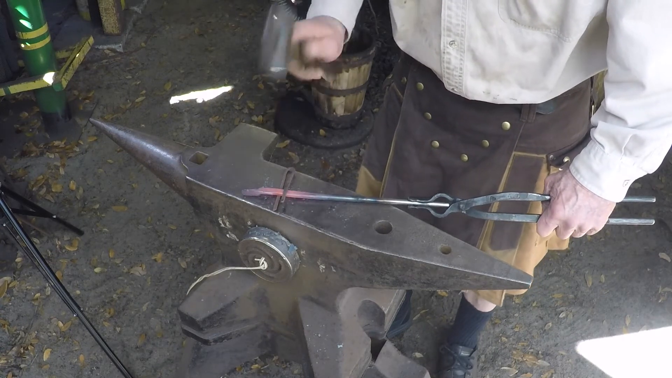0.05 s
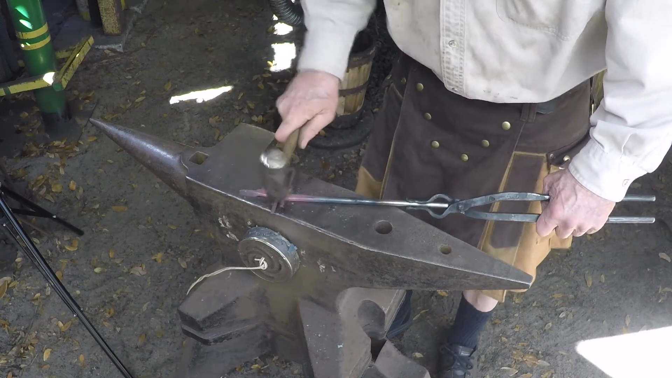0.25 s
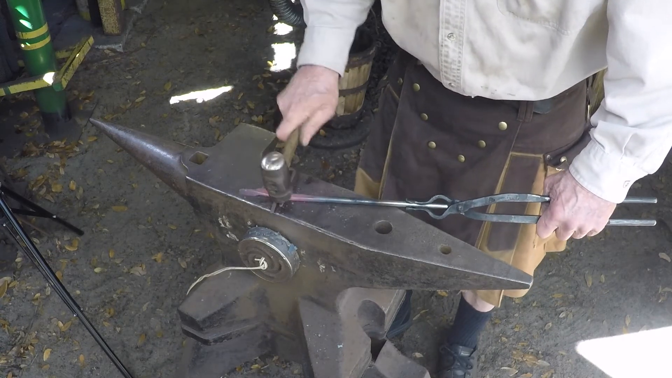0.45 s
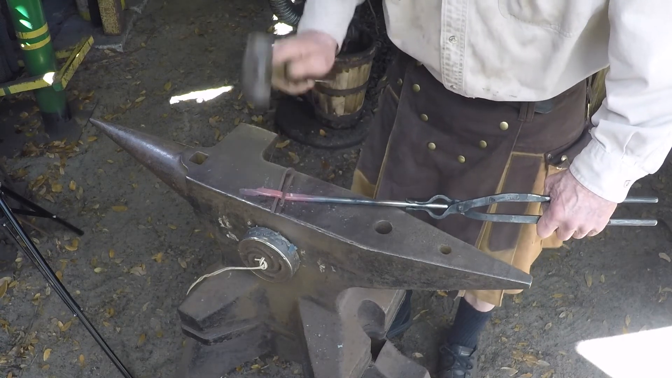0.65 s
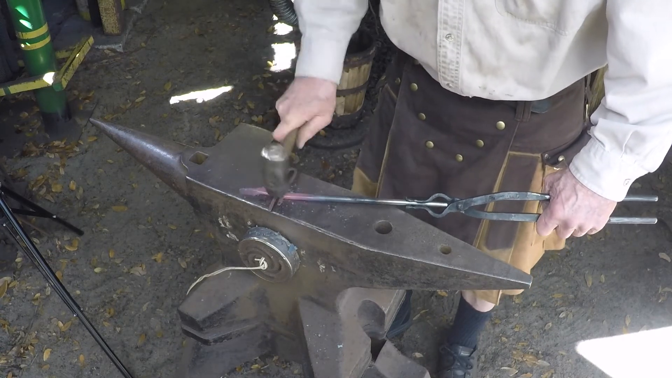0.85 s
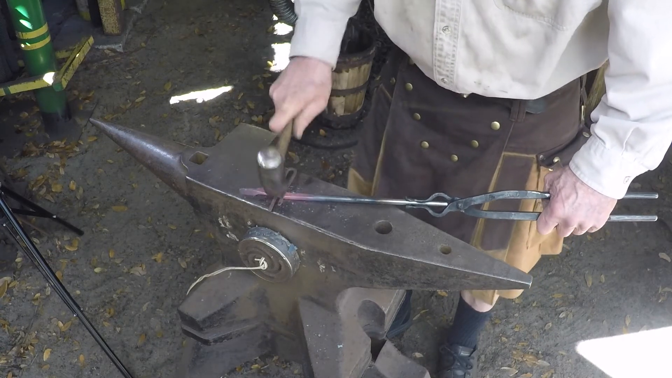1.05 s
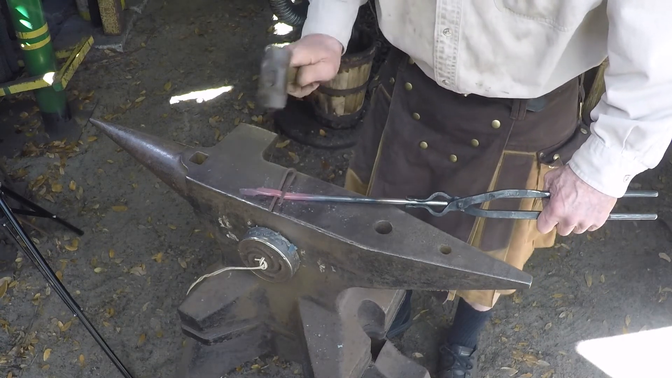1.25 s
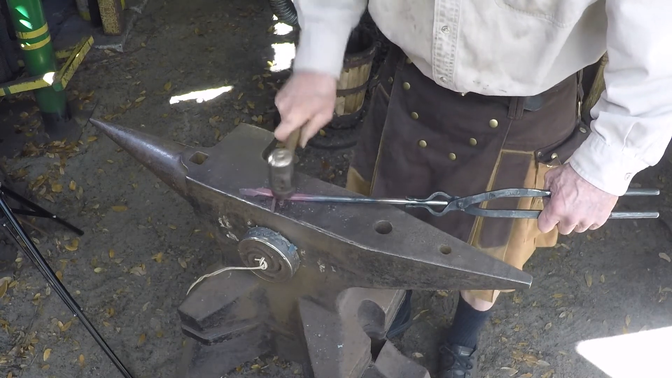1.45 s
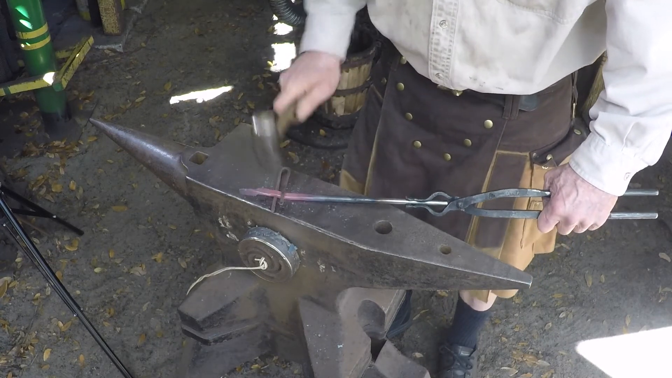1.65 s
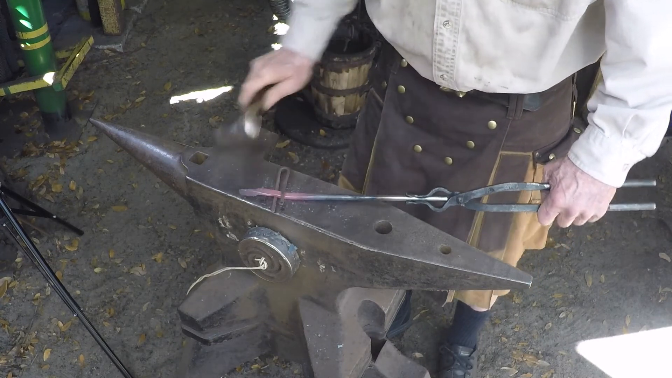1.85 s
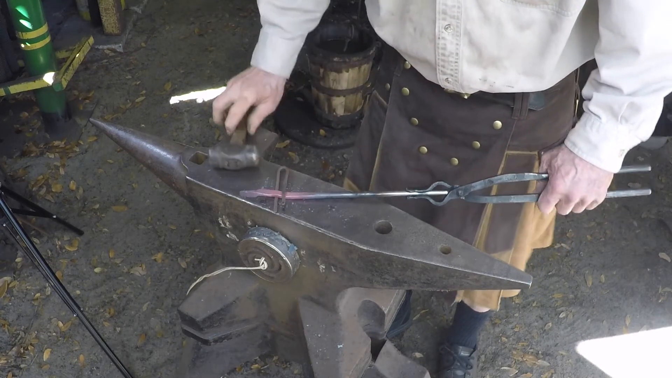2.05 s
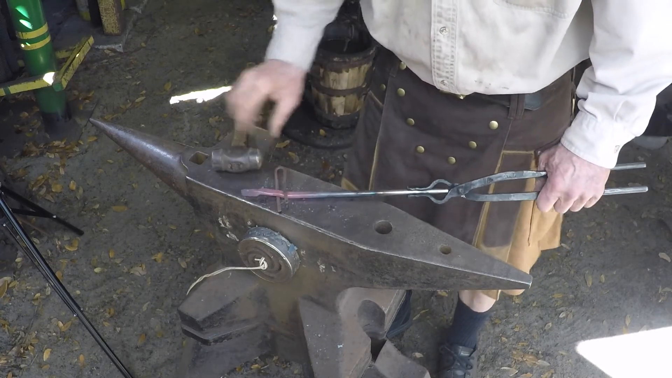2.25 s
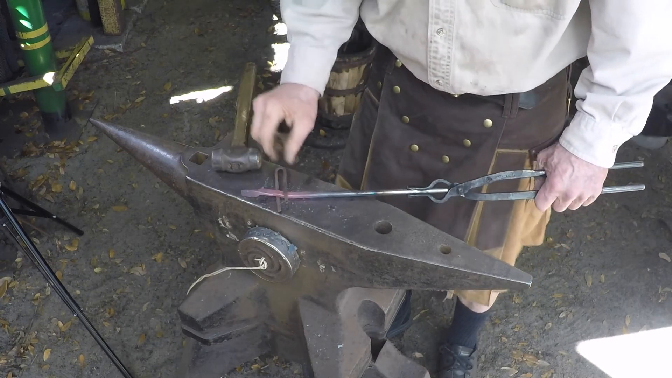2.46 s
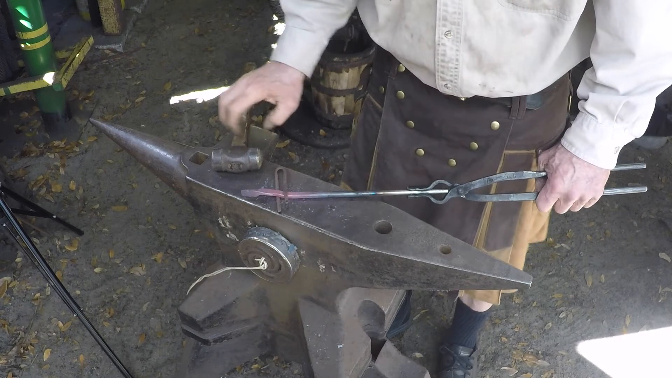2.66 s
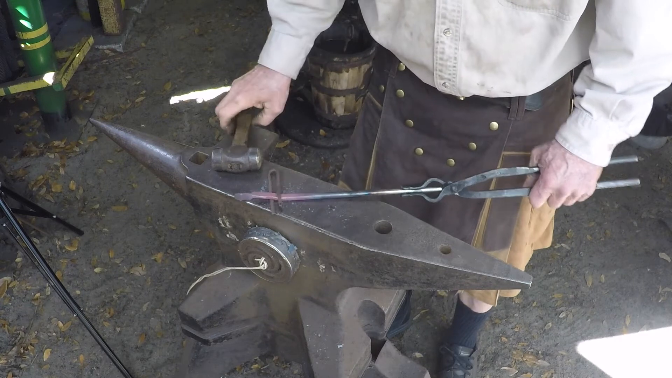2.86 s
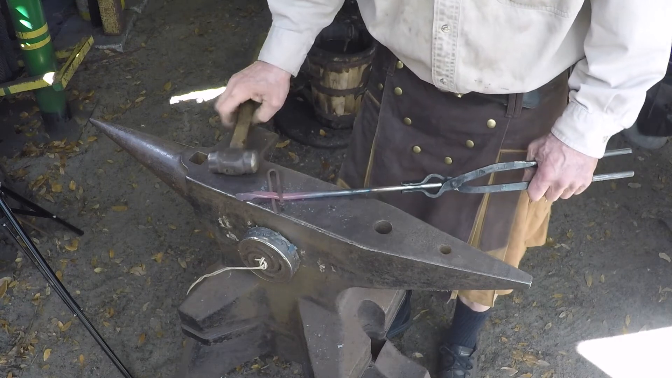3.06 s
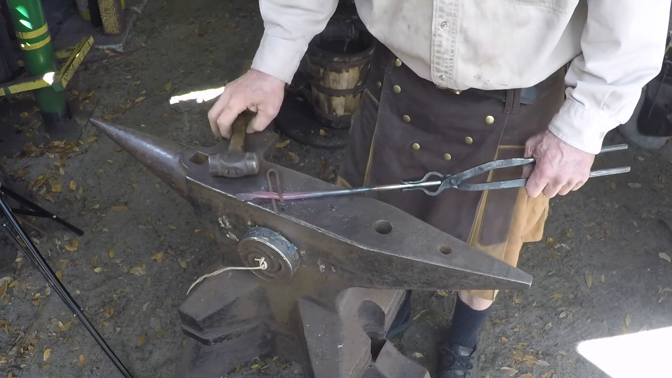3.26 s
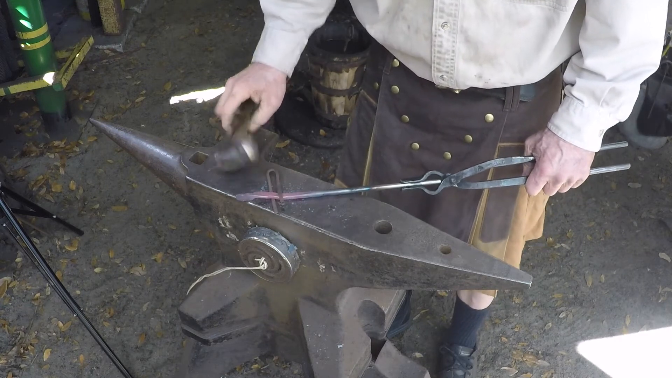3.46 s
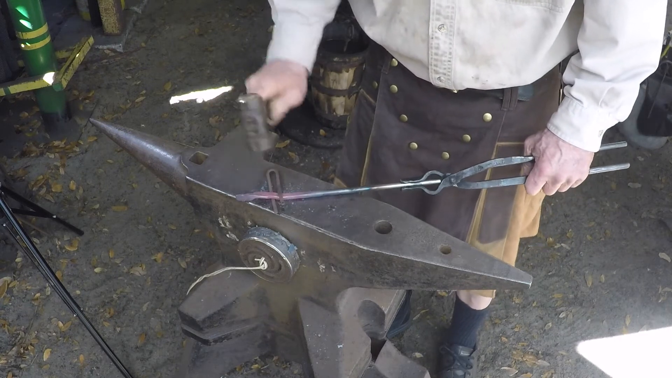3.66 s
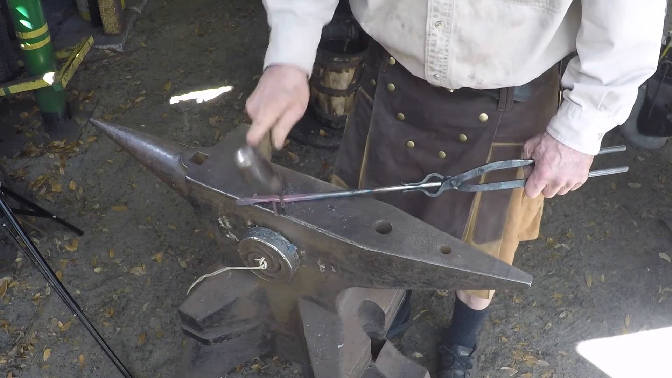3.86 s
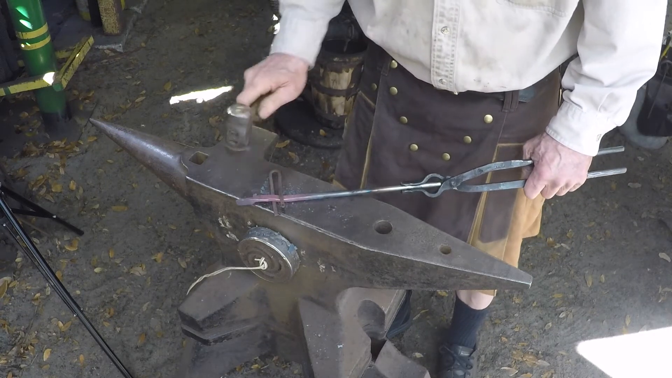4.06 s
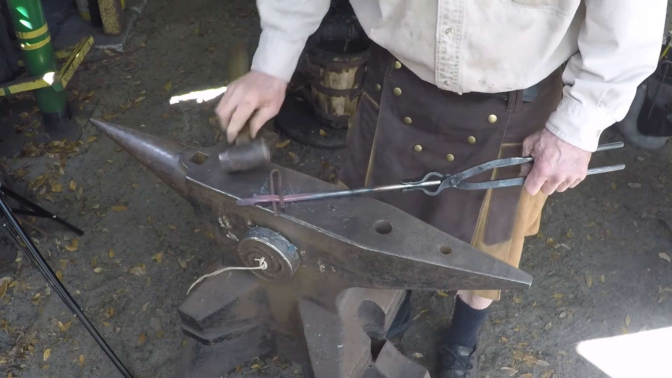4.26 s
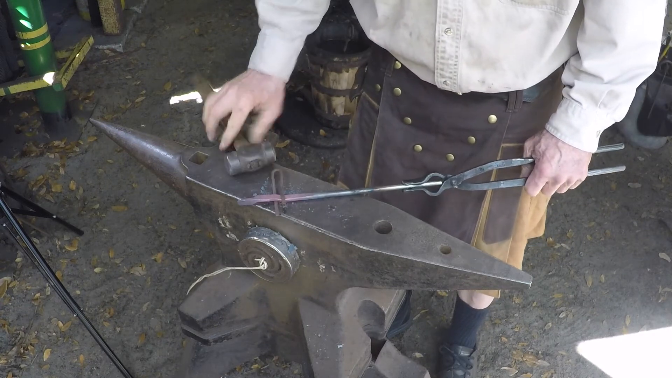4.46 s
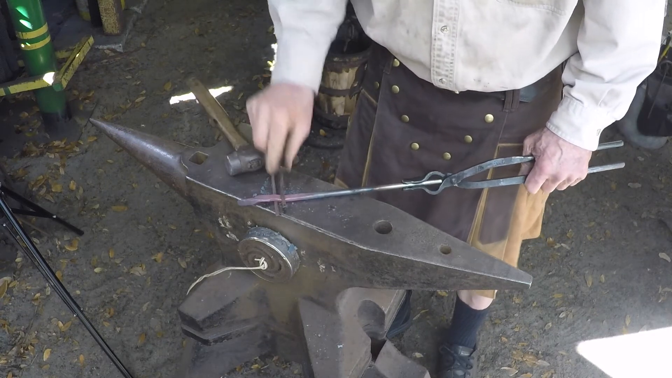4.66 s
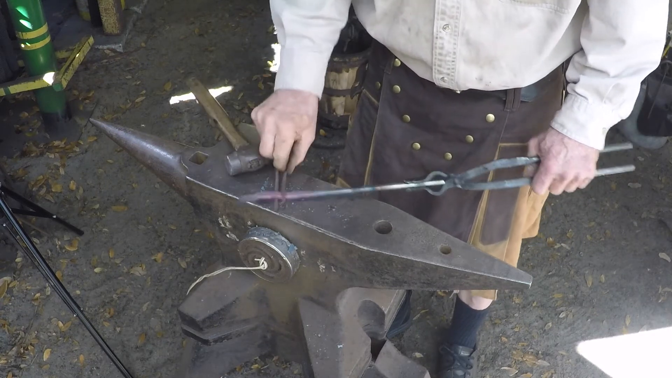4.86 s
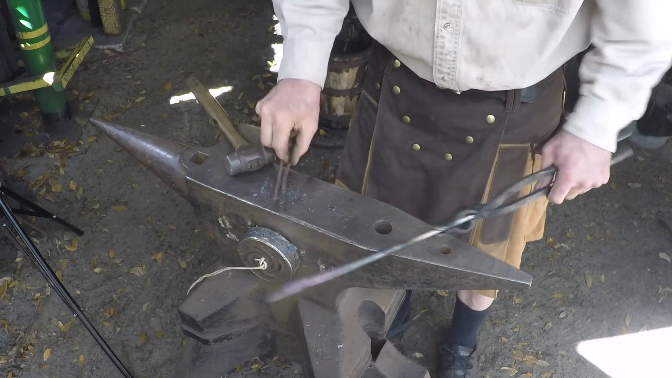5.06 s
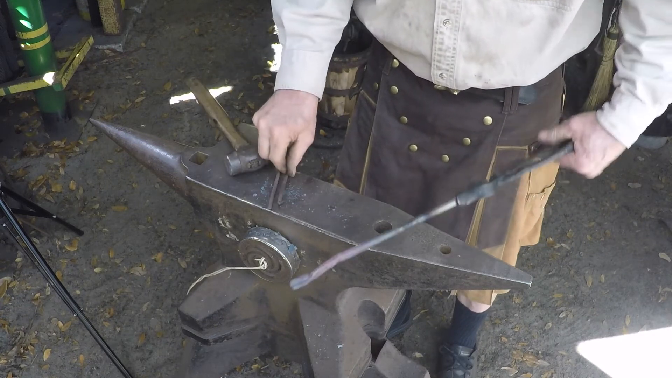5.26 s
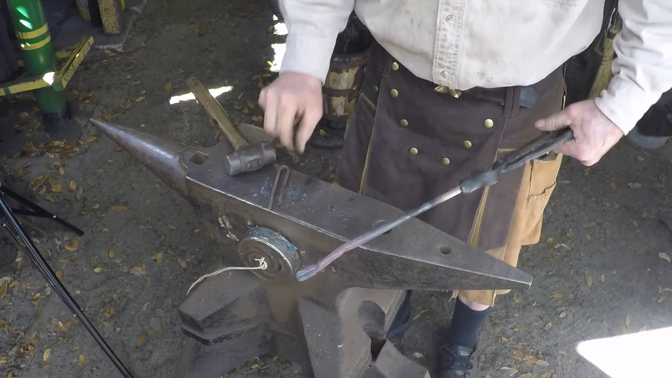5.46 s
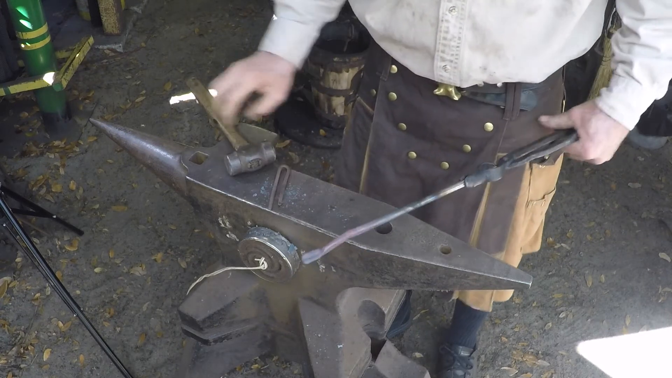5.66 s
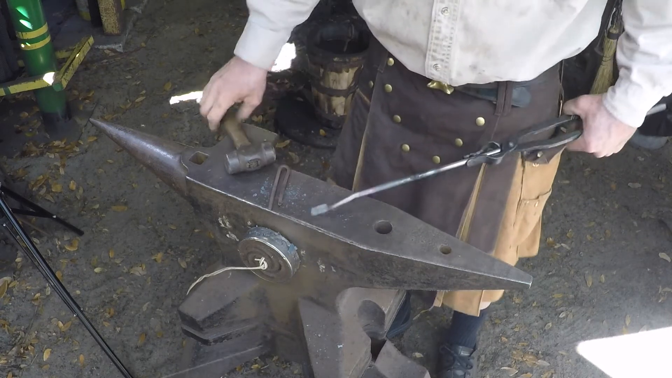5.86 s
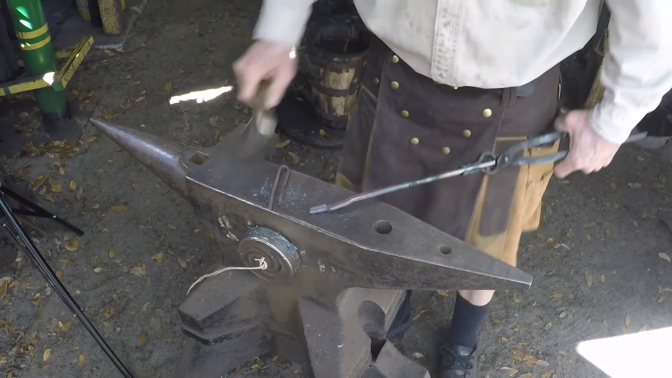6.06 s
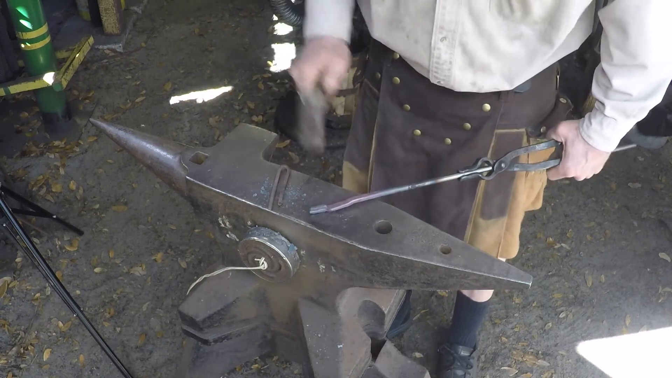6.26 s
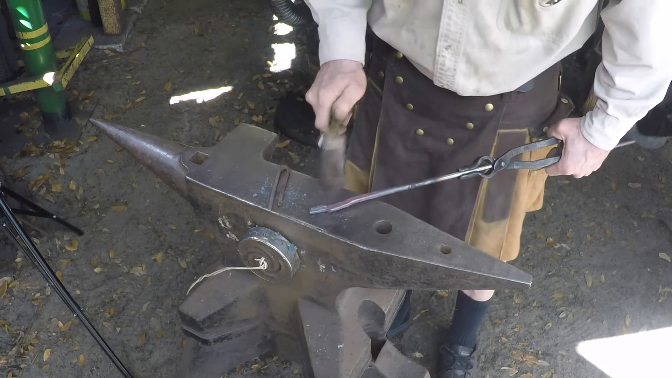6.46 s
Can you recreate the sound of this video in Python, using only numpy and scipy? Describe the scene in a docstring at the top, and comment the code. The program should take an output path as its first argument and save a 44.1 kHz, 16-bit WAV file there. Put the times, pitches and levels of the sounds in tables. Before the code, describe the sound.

Close view of a smith at an anvil in an open shed. Three heavy, noisy thuds with short clanks and low thumps leave a thin ring. The hammer then drops on the bare steel face, clacking and rocking in quickening rattles, three times over. One soft tap falls between. Finally the iron is drawn away with faint gritty scrapes, a tiny clink and ticks. Short echoes, outdoor air and low gusty rumble surround it.

```python
"""A smith drives a small tool into hot iron on an anvil: three heavy blows and a light one, in an open shed.
Each blow is a noisy thud with a short clank; it rings the anvil's modes and thumps stand and ground.
The hammer is also dropped on the bare face, where it bounces and rocks: hard clacks of steel on steel.
At the end the iron is drawn off and laid down again, with grainy scrapes and a few ticks of the tongs.
Short echoes of the shed and a wash of outdoor air, with a rumble that swells in gusts, surround it all."""
import sys
import numpy as np
from scipy import signal
from scipy.fft import rfft, irfft
from scipy.io import wavfile

SR = 44100
rng = np.random.default_rng(int(sys.argv[2]) if len(sys.argv) > 2 else 0)


def materialize(psi):
    """Save the field psi as 16-bit PCM at rate SR to the path in sys.argv[1].

    A 1-D psi becomes a single channel; in a 2-D psi each row is a channel.
    """
    bounded = np.clip(np.atleast_2d(psi).T, -1, 1)
    quanta = np.round(bounded * 32767).astype(np.int16)
    wavfile.write(sys.argv[1], SR, quanta)


N = 286914
T = np.arange(N) / SR  # time [s]

# Hammer blows through the tool; levels are relative within each layer:
# (time [s], knock level [dB], brightness [dB per octave], ring level [dB], spot on the anvil [-1 to 1],
#  thump level [dB], clank pitch [Hz], clank level [dB])
BLOWS = [(0.2368, -4.5, 0.96, -4, -0.89, 5, 830, -1.5), (0.8604, -2, -1.14, 0.5, 0.15, 3, 983, -7.5),
         (1.4147, -2, -1.4, 0.5, 0.54, 3.5, 1257, -3), (3.7874, -18.5, 2, -12, 0.2, -5, 2400, -25)]


def gain_of(db):
    """Turns decibels into amplitude."""
    return 10 ** (np.asarray(db) / 20)


def evened(x):
    """Scales a sound to rms 1."""
    return x / np.sqrt(np.mean(x ** 2) + 1e-20)


def read(points, hz):
    """Reads a table of (frequency, value) between its points, on a log-frequency axis."""
    f, value = np.transpose(points)
    return np.interp(np.log(hz + 1), np.log(f + 1), value)


def add(mix, s, sound):
    """Mixes a sound in at time s."""
    part = mix[round(s * SR):][:len(sound)]
    part += sound[:len(part)]


def noise(spectrum):
    """Steady noise of a given colour, rms 1."""
    white = rfft(rng.standard_normal(N))
    colour = gain_of(read(spectrum, np.fft.rfftfreq(N, 1 / SR)))
    return evened(irfft(white * colour, N))


def drift(t, rate):
    """Slow random wandering, rms 1: twelve sines of random phase, none faster than rate [Hz]."""
    f = np.geomspace(rate / 6, rate, num=12)[:, None]
    return evened(np.sin(2 * np.pi * (f * t + rng.random(f.shape))).sum(0))


def pulse(spectrum, bright, size=2048):
    """A click of energy 1 with the given colour, tilted above 500 Hz by its brightness."""
    hz = abs(np.fft.fftfreq(size, 1 / SR))
    tilt_db = bright * np.log2(np.maximum(hz, 500))
    log_gain = np.log(gain_of(read(spectrum, hz) + tilt_db))
    # Minimum phase: the click starts at once, with nothing before it
    click = np.fft.ifft(np.exp(np.conj(signal.hilbert(log_gain)))).real
    return click / np.linalg.norm(click)


def knock(spectrum, bright, chatter_db, chatter_s):
    """One contact, followed by a few milliseconds of chatter between the steel faces."""
    t = T[:SR // 10]
    chatter = rng.standard_normal(len(t)) * np.exp(-t / chatter_s)
    force = gain_of(chatter_db) * chatter / np.linalg.norm(chatter)
    force[0] = -1  # the contact itself
    return signal.fftconvolve(force, pulse(spectrum, bright))


def ping(hz, decay_s):
    """A few dying cycles of energy 1, which start within the first half cycle."""
    t = T[:SR // 10]
    onset = 1 - np.exp(-(np.pi * hz * t) ** 2)
    wave = -np.sin(2 * np.pi * hz * t) * np.exp(-t / decay_s) * onset
    return wave / np.linalg.norm(wave)


def ring(hz, t60, db, rise_s):
    """Dying sines that swell for a moment as they fill the space."""
    out = np.zeros(N)
    for f, life, level in zip(hz, t60, db):
        # Weak sines are cut off sooner
        t = T[:int(SR * life * np.clip((level + 95) / 60, .1, 2))]
        out[:len(t)] += gain_of(level - 60 * t / life) * np.sin(2 * np.pi * f * t)
    return out * (1 - np.exp(-T / rise_s))


def softness(hz, contact_ms, steep=6):
    """Change in dB: a contact cannot excite periods shorter than it lasts."""
    return -10 * np.log10(1 + (hz * contact_ms / 1000) ** steep)


def air():
    """A steady outdoor wash over a low rumble that swells with each gust."""
    # Relative colour of the wash: (frequency [Hz], level [dB])
    wash_colour = [(20, -8), (55, -9.5), (110, -12), (200, -16), (400, -21.5), (900, -24), (1600, -36),
                   (3000, -39.5), (5500, -38.5), (8000, -46.5), (15000, -50)]
    # Relative colour of the rumble: (frequency [Hz], level [dB])
    rumble_colour = [(10, -7), (28, 2.5), (55, -1.5), (90, -8.5), (160, -25), (500, -64.5)]
    # Gusts: (time of peak [s], half width [s], rumble level [dB])
    gusts = [(0, 0.21, -35.5), (1.3, .3, -45), (2.2, .25, -39), (4.55, 0.29, -40), (5.05, 0.11, -36)]
    wash_db, rumble_db = -50.5, -47
    power = gain_of(rumble_db) ** 2
    for s, width, db in gusts:
        power = power + gain_of(db) ** 2 * np.exp(-((T - s) / width) ** 2)
    return gain_of(wash_db) * noise(wash_colour) + np.sqrt(power) * noise(rumble_colour)


def blows():
    """The tool sinks into soft hot iron: a dull thud with a short clank."""
    # Relative colour of the thud: (frequency [Hz], level [dB])
    thud = [(60, -19.5), (150, -15), (290, -9.5), (420, -6.5), (800, 0), (1300, -2.5), (1600, -9.5),
            (2100, -8), (3200, -15.5), (5500, -15), (8000, -22.5), (11000, -21), (15500, -28)]
    out = np.zeros(N)
    for s, db, bright, _, _, _, clank_hz, clank_db in BLOWS:
        add(out, s, gain_of(db + 7.5) * knock(thud, bright, chatter_db=8.5, chatter_s=0.0047))
        add(out, s, gain_of(clank_db + 8.5) * ping(clank_hz, decay_s=0.00128))
    return out


def damping(t):
    """Ring in dB taken by time t: hammer or tool, pressed on the face, damps the anvil."""
    # Presses: (start [s], length [s], loss [dB])
    presses = [(2.594, 0.31, 10.5), (3.244, 0.052, 3.5), (3.768, 0.0244, 10.5)]
    return sum(db * np.clip((t - s) / length, 0, 1) for s, length, db in presses)


def anvil(contacts, rise_s=0.0048, waver_db=1.75):
    """Each strike feeds energy into the same modes, by where, how hard and through what it lands."""
    # Modes of anvil and hammer; levels are relative to each strike's ring level:
    # (frequency [Hz], time to die by 60 dB [s], level through the tool [dB], its change per unit of spot [dB],
    #  level on the bare face [dB], its change per unit of spot [dB])
    modes = [(1120.2, 1.95, -36, 8, -39, 11), (4420.3, .9, -35, -2, -27, -7), (4484, .75, -44, 4, -36, 0),
             (4904.7, 3.9, -46, 11, -38, 1), (5209.5, 1.15, -34, 9, -24, -6),
             (5450.6, 1.5, -36.5, 8, -32, 15), (5696, 2, -44, 5, -39, 1), (6261.4, .92, -34, -1, -20, -1),
             (1355, .3, -20.5, 9, -23, 2), (2414, .33, -29.5, 8, -27, -13), (3381, .35, -31, 3, -23, -2),
             (2231, .55, -46, 2, -33, -7), (2794, .6, -46, 8, -39, -3), (3136, .3, -48, 3, -28, 0),
             (4258, .35, -29, 1, -23, 4), (7031, .2, -38, -4, -42, 0), (7512, .35, -44, -4, -42, -6),
             (7929, .6, -60, -7, -37, -7), (8086, .26, -38, 1, -45, 0), (8564, .56, -56, -10, -37, -5),
             (8969, .3, -45, -4, -37, -4), (9383.5, .95, -43, 0, -34, -1), (10275, .36, -46, -2, -46, 0),
             (10760, .56, -50, 0, -48, 2), (12060, .55, -51, 0, -53, -5), (12280, .4, -47, -3, -42, -4),
             (12340, .58, -48, -2, -54, -12), (13090, .25, -47, -9, -56, -5), (13950, .5, -47, -5, -56, 0),
             (14780, .55, -51, -5, -57, -12), (15100, .45, -44, 0, -48, -8)]
    hz, t60, tool_db, tool_slope, face_db, face_slope = np.transpose(modes)
    laid_s, laid_db = 5.8845, -28.5  # the iron, laid down again, stirs the anvil
    starts = np.array([row[0] for row in BLOWS + contacts] + [laid_s])

    # One row per strike, one level per mode
    fed_db = [tool_db + db + spot * tool_slope for _, _, _, db, spot, *_ in BLOWS]
    for _, _, contact_ms, db, spot, *_ in contacts:
        fed_db.append(face_db + db + spot * face_slope + softness(hz, contact_ms, steep=9.1))
    fed_db.append(tool_db + laid_db)

    t, out = T[::64], np.zeros(N)  # levels change slowly, so coarse time steps do
    age = np.maximum(t - starts[:, None], 0)
    rise = 1 - np.exp(-age / rise_s)
    # A strike loses only what is damped after it lands
    lost_db = damping(starts)[:, None] - damping(t)
    for f, life, level_db in zip(hz, t60, np.transpose(fed_db)):
        rings = gain_of(level_db[:, None] + lost_db - 60 * age / life) * rise
        waver = gain_of(waver_db * drift(t, rate=4))  # the moving smith shifts the reflections
        level = np.linalg.norm(rings, axis=0) * waver  # the energies of the strikes add up
        out += np.interp(T, t, level) * np.sin(2 * np.pi * (f * T + rng.random()))
    return out


def stand():
    """Blows shake the stand and the ground, most under heavy ones, and the shed booms back."""
    # Modes of stand and ground: (frequency [Hz], time to die by 60 dB [s], relative level [dB])
    modes = [(49.4, 0.72, -24.5), (86.95, 0.59, -28), (98.1, 0.21, -21), (186, 0.58, -34),
             (263, 0.32, -35.5)]
    # Boomy late echoes: (frequency [Hz], band width [Hz], level against the blow [dB], delay [s], spread [s])
    booms = [(456, 98.5, -34.5, .11, 0.028), (624.5, 17, -43.5, 0.16, 0.044)]
    hz, t60, mode_db = np.transpose(modes)
    out, t = np.zeros(N), T[:SR // 2]
    for s, db, _, _, _, thump_db, *_ in BLOWS:
        add(out, s, ring(hz, t60, mode_db + thump_db, rise_s=0.012))
        for f, width, boom_db, delay, spread in booms:
            edges = [f - width / 2, f + width / 2]
            band_filter = signal.butter(2, edges, "band", fs=SR, output="sos")
            band = signal.sosfilt(band_filter, rng.standard_normal(len(t)))
            swell = np.exp(-((t - delay) / spread) ** 2 / 2)
            add(out, s, gain_of(db + boom_db) * evened(band) * swell)
    return out


def shed(x, echo_s=.0108, echo_db=-7, cluster_db=-5, tail_db=-4):
    """A first echo off the floor, a cluster from nearby things, then a short tail."""
    # Life of the tail: (frequency [Hz], time to die by 60 dB [s])
    tail_life = [(100, 1), (500, 0.36), (1200, 0.32), (3000, 0.29), (6000, 0.41), (14000, 0.29)]
    t = T[:SR]
    late = np.maximum(t - echo_s, 0)
    cluster = rng.standard_normal(SR) * (t > echo_s) * np.exp(-late / .008)
    # Noise in which each pitch dies at its own pace
    hz, when, z = signal.stft(rng.standard_normal(SR), SR, nperseg=256)
    fading = z * gain_of(-60 * when / read(tail_life, hz)[:, None])
    tail = signal.istft(fading, SR, nperseg=256)[1][:SR] * (t > echo_s)
    response = gain_of(cluster_db) * cluster / np.linalg.norm(cluster)
    response += gain_of(tail_db) * tail / np.linalg.norm(tail)
    response[round(echo_s * SR)] += gain_of(echo_db)
    return signal.fftconvolve(x, response)[:N]


def taps(contacts):
    """Steel on steel: a hard clack, pitched by the way the hammer head lands."""
    # Relative colour of the clack: (frequency [Hz], level [dB])
    clack = [(100, -12), (500, -14), (780, 2.5), (1000, -3.5), (1250, -3), (1520, -13), (1850, -9),
             (2700, -7.5), (3200, 0), (3800, -6.5), (5500, -1.5), (8000, -12), (15000, -22.5)]
    out, hz = np.zeros(N), np.geomspace(100, 16000, num=80)
    for s, db, contact_ms, _, _, clack_hz, clack_db in contacts:
        colour = np.transpose([hz, read(clack, hz) + softness(hz, contact_ms, steep=6.0)])
        add(out, s, gain_of(db + 3.5) * knock(colour, 0, chatter_db=5.5, chatter_s=0.0059))
        add(out, s, gain_of(clack_db + 5) * ping(clack_hz, decay_s=0.0042))
    return out


def rocking():
    """The dropped hammer head rocks to rest between toe and heel, ever sooner, weaker and softer."""
    # First contact of each rocking; levels are relative within each layer:
    # (start [s], length [s], first gap [s], knock level [dB], contact time [ms], ring level [dB],
    #  spot on the anvil [-1 to 1], clack pitch of the toe [Hz])
    rocks = [(2.1114, .125, .03, -12, 0.18, -14.5, 0.99, 3080),
             (3.2448, .06, 0.024, -14, 0.23, -15, -0.23, 3450),
             (4.4046, .3, .046, -11.5, 0.25, -11, 0.13, 2450)]
    # From one contact to the next
    gap_ratio, loss_db, ring_loss_db, softening = 0.96, 1.82, 1.37, 1.073
    clack_db = -5.5  # clack against knock
    uneven_db, jitter_s = 2, .001  # chance in strength and time
    heel_hz = 1035  # every other contact falls on the heel, with a lower clack
    rows, turn = [], np.arange(12)
    for start, length, gap, db, contact_ms, ring_db, spot, toe_hz in rocks:
        shift, luck = rng.standard_normal((len(turn), 2)).T
        gaps = gap * gap_ratio ** turn
        after = np.cumsum(gaps) - gaps
        for k in turn[after < length]:
            s = start + after[k] + jitter_s * shift[k]
            knock_db = db - loss_db * k + uneven_db * luck[k]
            clack_hz = toe_hz if k % 2 else heel_hz
            # Columns as in the bounces
            rows.append((s, knock_db, contact_ms * softening ** k,
                         ring_db - ring_loss_db * k, spot, clack_hz, knock_db + clack_db))
    return rows


def ticks():
    """The tongs tick faintly, at loose intervals, around the moment the iron is laid down."""
    from_s, to_s, gap_s = 5.8, 6.1, 0.18
    level_db, spread_db, bright, swell_s = -62, 4, -1, 0.01  # brightness in dB per octave
    rows = []
    for s, (late, luck) in zip(np.arange(from_s, to_s, gap_s), rng.random((20, 2))):
        # Columns as in the scrapes
        rows.append((s + gap_s * late, level_db + spread_db * (2 * luck - 1), bright, swell_s))
    return rows


def handling():
    """Grainy scrapes and ticks of iron and tongs, and the clink of the small tool as it is lifted."""
    # Scrapes: (time [s], relative level [dB], brightness [dB per octave], swell time [s])
    scrapes = [(3.52, -51, -13.5, 0.018), (3.669, -64.5, -3, 0.062), (4.896, -56, 3, .021),
               (4.95, -49.5, 1.5, 0.003), (5.159, -46, 7, 0.0021), (5.685, -39.5, 7, .0015),
               (5.8848, -40, 3, 0.0051), (6.228, -57, -6, .0015)]
    # Relative colour of a scrape: (frequency [Hz], level [dB])
    scratch = [(200, -8), (900, 3.5), (4000, 3), (8000, -6.5), (12000, -11.5), (16000, -10.5)]
    # Modes of the small tool: (frequency [Hz], time to die by 60 dB [s], level [dB])
    tool = [(4597, 0.068, -61), (6100, 0.11, -53), (6840, 0.2, -63), (9480, 0.058, -46),
            (11750, 0.068, -42.5), (14830, .28, -63)]
    out, t = np.zeros(N), T[:SR // 4]
    for s, db, bright, swell_s in scrapes + ticks():
        # Uneven grains: noise of random strength from sample to sample
        grit = evened(rng.standard_normal(len(t)) * rng.exponential(1, len(t)))
        swell = t / swell_s * np.exp(1 - t / swell_s)
        add(out, s, gain_of(db) * signal.fftconvolve(grit * swell, pulse(scratch, bright)))
    add(out, 5.159, ring(*np.transpose(tool), rise_s=0.00043))
    return out


def scene():
    """Contacts and ring with their echoes in the shed, the thump of the stand, and the air."""
    # The hammer drops and bounces on the bare face; levels are relative within each layer:
    # (time [s], knock level [dB], contact time [ms], ring level [dB], spot on the anvil [-1 to 1],
    #  clack pitch [Hz], clack level [dB])
    bounces = [(1.9754, -6.5, .29, -22, -.1, 3070, -7), (2.0075, -7, 0.091, -2.5, -.08, 3260, -7),
               (2.0205, -5.5, .2, -22.5, .9, 3300, -5.5), (2.0802, -3.5, .22, -12, .84, 3250, 2),
               (3.1139, -8.5, .26, -13.5, 1, 3200, -5.5), (3.1615, -10, 0.23, -10.5, 0.77, 3140, -20),
               (3.1985, -10, 0.23, -11, 0.47, 1145, -9), (4.266, -7.5, .25, -34, -.1, 1290, -7.5),
               (4.28, -3, 0.09, 1, -.25, 2414, 0), (4.2922, -4, 0.14, -26, -0.014, 2438, -7.5),
               (4.3321, -6.5, 0.27, -14, .24, 2543, 4.5)]
    contacts = bounces + rocking()
    knocks = blows() + handling() + taps(contacts)
    steel = anvil(contacts)
    room = shed(knocks + gain_of(-18) * steel)  # the ring is turned down by 18 dB for the echoes
    return (knocks + steel + room + stand() + air())[None]


def record(dry):
    """The loudest peaks are rounded off at full scale; then the treble ends near 15.7 kHz."""
    rounded = dry / (1 + dry ** 6) ** (1 / 6)
    low_pass = signal.firwin(255, 15700, window=("kaiser", 9), fs=SR)
    return signal.oaconvolve(rounded, low_pass[None], "same")


dry = scene()
out = record(dry)
materialize(out)
```